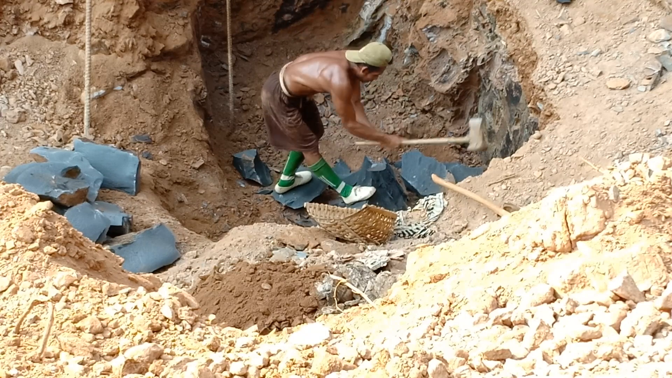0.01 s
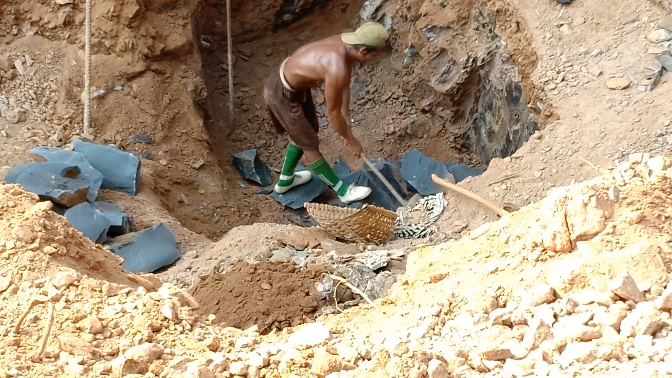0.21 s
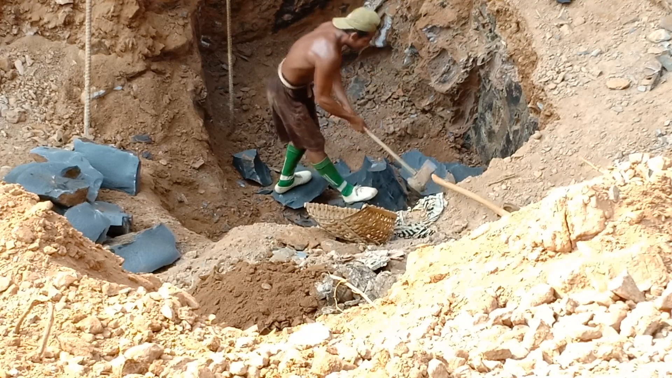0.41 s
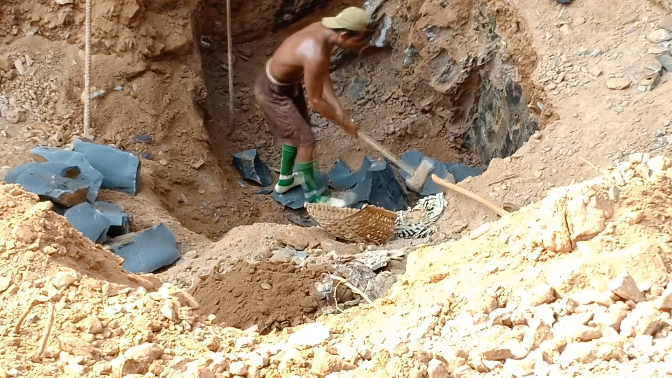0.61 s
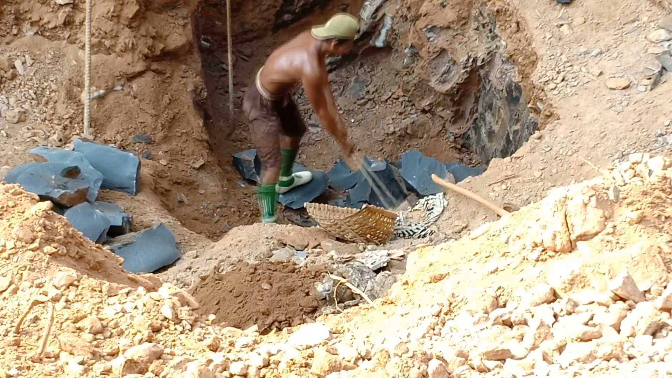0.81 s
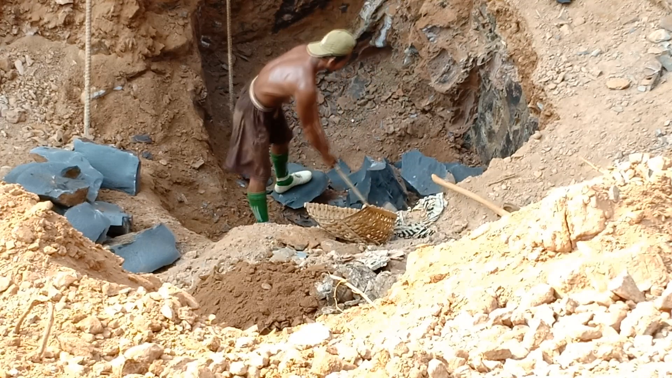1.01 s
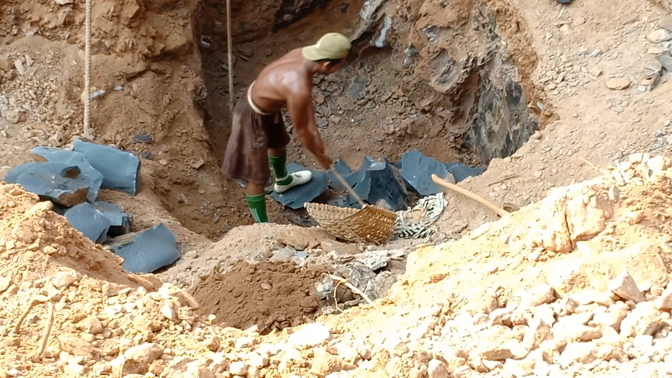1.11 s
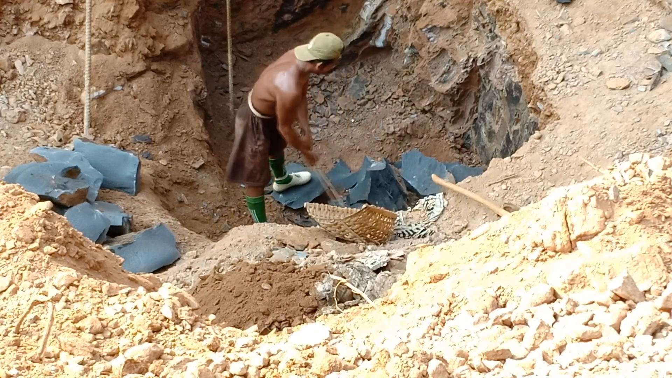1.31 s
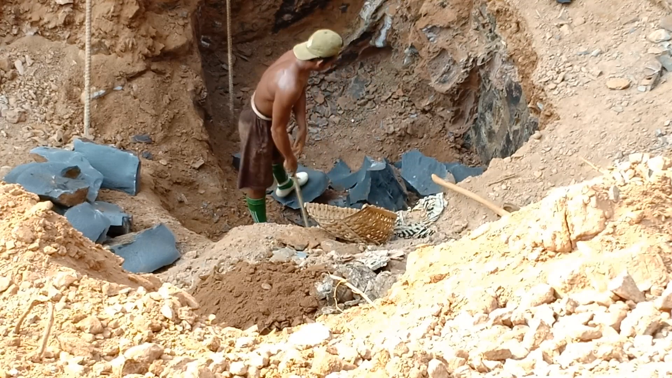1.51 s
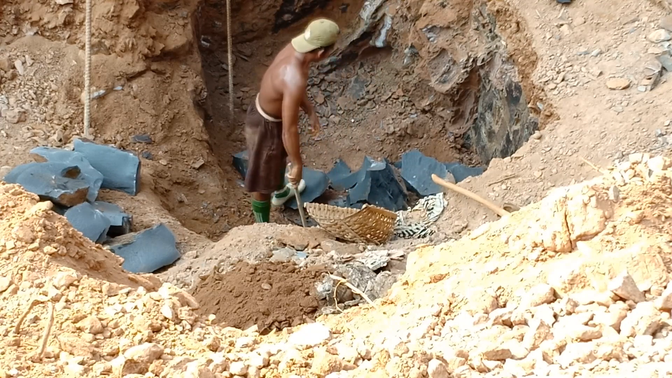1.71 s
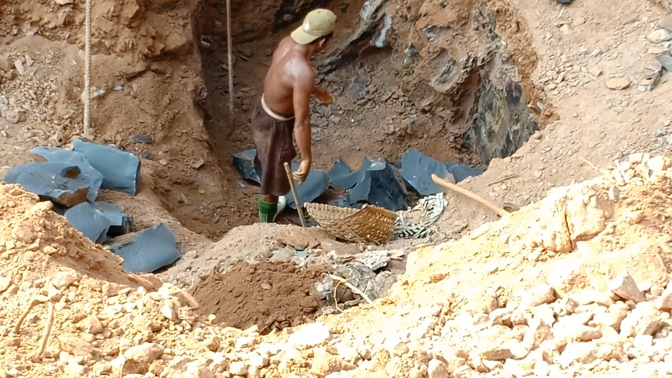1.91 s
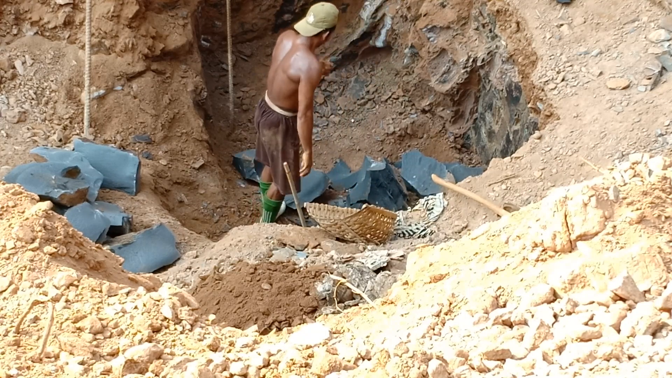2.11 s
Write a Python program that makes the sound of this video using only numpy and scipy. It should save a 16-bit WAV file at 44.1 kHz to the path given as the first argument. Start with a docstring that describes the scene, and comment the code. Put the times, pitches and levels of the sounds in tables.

```python
"""A steel hammer works hard rock in a quarry pit, over faint outdoor noise and a far, wavering hum.
After soft scuffs on the soil comes one heavy blow, and a loose flake tumbles; small chips tick.
Then follow a dull knock and a clink that chatters on stone, and later a loose stone shifts.
Contacts are clicks, bursts of noise and dying tones; the ground's thuds are low sine waves.
Fading noise makes the answer of the rubble and pit walls to hammer, chips and loose stone."""
import sys
import numpy as np
from scipy import signal
from scipy.fft import rfft, irfft
from scipy.io import wavfile
from scipy.ndimage import map_coordinates

SR = 44100
rng = np.random.default_rng(int(sys.argv[2]) if len(sys.argv) > 2 else 0)


def wrap_up_sound(samples):
    """Save the sound to the file named by the first command line argument, as 16-bit audio."""
    columns = np.atleast_2d(samples).T
    # keep every value between -1 and 1, then stretch to whole-number steps
    tamed = np.clip(columns, -1, 1)
    steps = np.round(tamed * 32767).astype(np.int16)
    wavfile.write(sys.argv[1], SR, steps)


N = 97020
T = np.arange(N) / SR
HZ = np.fft.rfftfreq(2 * N, 1 / SR)
REF_SAMPLES = SR // 100  # levels of contacts, chips and steel spread their energy over 10 ms

# The clink's contacts. Each row: start in seconds, level in dB, time for the crunch to fall 60 dB
# in seconds, treble boost or cut in dB.
CLINK_CONTACTS = [(.9483, -19.5, 0.018, 5.5), (.9515, -25, 0.054, -4.5), (.9596, -18, 0.0097, -8.5),
                  (.9632, -24.5, 0.044, -6.5), (.9821, -35.5, 0.018, 1)]
# The click's share of the energy of click and crunch together, 0 to 1, by kind of contact.
CLICK_SHARE = dict(blow=.17, knock=0.067, clink=0.17, small=0.51)
# Tone colour of the pit's answer. Each row: frequency in Hz, level in dB.
PIT_TONE = [(60, 2.5), (600, -6), (2000, -1.5), (12000, -0.5)]
# How alike the ears are for outdoor and soil noise. Each row: frequency in Hz, likeness (1 = same).
OUTDOOR_ALIKE = [(120, 0.73), (300, 0.41), (950, 0.068)]


def amp(db):
    """Turn decibels into gain."""
    return 10 ** (np.asarray(db) / 20)


def fade(t60):
    """A decay of 60 dB in t60 seconds."""
    return np.exp(-np.log(1000) * T / t60)


def norm(x):
    """Scale to energy 1 per channel, on average over the channels."""
    return x / np.sqrt(np.mean(np.sum(x ** 2, axis=-1)) + 1e-30)


def along(points, hz):
    """Read (Hz, value) points on a logarithmic frequency axis."""
    f, v = np.transpose(points)
    return np.interp(np.log(hz + 1), np.log(f + 1), v)


def filtered(x, response):
    """Pass x through a frequency response."""
    return irfft(rfft(x, 2 * N) * response)[..., :N]


def causal(colour):
    """A colour as a minimum-phase response, which puts its energy as early as it can."""
    c = irfft(along(colour, HZ) * np.log(10) / 20)
    return np.exp(rfft(np.r_[c[0], 2 * c[1:N]], 2 * N))


def delayed(x, s):
    """Make x start at s seconds."""
    k = int(np.clip(round(s * SR), 0, N - 1))
    return np.concatenate([np.zeros_like(x[..., :k]), x[..., :N - k]], axis=-1)


def noise(colour, alike):
    """Coloured stereo noise of rms 1; more side signal makes the ears less alike."""
    turn = np.arccos(np.clip(along(alike, HZ), -1, 1)) / 2
    shares = np.array([np.cos(turn), np.sin(turn)])
    mid, side = filtered(rng.standard_normal((2, N)), amp(along(colour, HZ)) * shares)
    return norm(np.array([mid + side, mid - side])) * np.sqrt(N)


def wobble(rate):
    """A smooth random curve with rate random points a second."""
    return map_coordinates(rng.standard_normal(256), [T * rate], mode="mirror")


def hammer():
    """The blow and its flake, the knock and the clink each ring a body and draw an answer from the pit."""
    # Contacts of the blow, the tumbling flake and the knock. Each row: start in seconds,
    # level in dB, time for the crunch to fall 60 dB in seconds, treble boost or cut in dB.
    blow_contacts = [(.2031, -15, .045, 0.5), (.2088, -17, .04, -1), (.2123, -18.5, .025, -11.5),
                     (.2149, -16, .04, -5)]
    flake_contacts = [(.2475, -31.5, 0.041, -9), (.2555, -26.5, 0.083, -4.5), (.266, -25.5, 0.15, -3),
                      (.2755, -28, 0.17, -5)]
    knock_contacts = [(.9216, -28.5, 0.072, 5.5)]
    # Tone colours of the contacts, and of the pit's answer from where the clink lands,
    # which the knock shares. Each row: frequency in Hz, level in dB.
    blow_tone = [(30, -35.5), (170, -3.5), (310, 0.5), (410, -1), (540, 5.5), (850, 2), (1400, -1.5),
                 (2700, -1.5), (3600, -19), (4200, -10.5), (6300, -8), (8200, -32.5), (15000, -36.5)]
    knock_tone = [(50, -11), (220, -4.5), (500, -3.5), (850, -3.5), (1300, -9.5), (2100, -2), (3000, -35),
                  (5500, -22.5), (8000, -54)]
    clink_tone = [(40, -10), (400, -10.5), (560, 9), (900, 6.5), (1300, -3), (2200, -0.5), (3700, -10),
                  (5200, -3.5), (6300, -2), (8200, -29.5), (15000, -28.5)]
    clink_pit_tone = [(100, 4), (750, -7), (1800, 1), (2800, 2), (5500, 0)]
    # Tones of the slab, its flake, the knocked block and the clinked rock. Each row: frequency
    # in Hz, typical level against the contact in dB, time to fall 60 dB in seconds.
    slab_modes = [(322, -19.5, 0.071), (596, -9, .05), (845, -10, 0.043), (1047, -18, 0.023),
                  (4290, -12, .015), (4410, -25, .3), (5200, -18, .035), (5690, -17, .02)]
    flake_modes = [(502.5, -4, 0.053)]
    block_modes = [(814, 7, 0.068), (990, -3.5, 0.028)]
    rock_modes = [(572, -11, 0.013), (842, -6, 0.019), (1064, -12, 0.055), (1982, -12, 0.1247)]

    blow = contacts(blow_contacts, blow_tone, slab_modes, CLICK_SHARE["blow"])
    flake = contacts(flake_contacts, blow_tone, flake_modes, CLICK_SHARE["blow"])
    knock = contacts(knock_contacts, knock_tone, block_modes, CLICK_SHARE["knock"])
    clink = contacts(CLINK_CONTACTS, clink_tone, rock_modes, CLICK_SHARE["clink"])
    return (in_pit(blow + flake, PIT_TONE, near_db=-16.5, tail_db=-11.5)
            + in_pit(knock, clink_pit_tone, near_db=-19, tail_db=-9.5, right_db=1.5)
            + in_pit(clink, clink_pit_tone, near_db=-5.5, tail_db=-11, lag_ms=.21, right_db=0.5)
            + in_pit(steel(), PIT_TONE, near_db=-20, tail_db=-17, lag_ms=.21))


def contacts(rows, colour, modes, click_share):
    """Each contact is a click and a short crunch of crushed grit, and rings the struck body if it has modes."""
    spread = 0.2  # how much the crunch differs between the ears
    treble_hz = 3375  # a hard contact is brighter above this, a soft one duller
    ring_blur = .003  # the grit roughens the ring: a mode's width over its frequency
    out = np.zeros((2, N))
    body = causal(colour)
    click_share = np.clip(click_share, 0, 1)
    click = norm(irfft(body)[:N])
    for s, db, t60, treble_db in rows:
        mid, side = rng.standard_normal((2, N)) * fade(t60)
        crunch = norm(filtered(np.array([mid + spread * side, mid - spread * side]), body))
        # each tone's level varies a little at random, by about 1 dB
        ring = sum(amp(level + rng.normal(0, 1)) * mode(hz, life, ring_blur)
                   for hz, level, life in modes)
        impact = ring - np.sqrt(click_share) * click + np.sqrt(1 - click_share) * crunch
        hardness = causal([(treble_hz / 2, 0), (treble_hz, treble_db)])
        out += amp(db) * delayed(filtered(impact, hardness), s)
    return out * np.sqrt(REF_SAMPLES)


def mode(hz, t60, blur):
    """One dying tone of energy 1; blur makes its phase wander, which roughens it."""
    wander = np.cumsum(rng.standard_normal(N)) * np.sqrt(2 * np.pi * abs(blur) * hz / SR)
    rise = 1 - np.exp(-T * hz)
    return norm(np.sin(2 * np.pi * hz * T + wander) * fade(t60) * rise)


def steel():
    """The clink rings the steel head, whose slight unevenness splits each partial into a beating pair."""
    # Tones of the head. Each row: frequency in Hz, level in dB, time to fall 60 dB in seconds.
    steel_modes = [(6098, -29.5, .48), (10160, -40.5, .34), (12180, -46, .3), (13560, -51, .24)]
    twin_split_hz, twin_db = 37, -5  # a weaker twin just above each partial
    ring = np.zeros(N)
    for hz, db, t60 in steel_modes:
        twin = amp(twin_db) * mode(hz + twin_split_hz, t60, blur=0)
        ring += amp(db) * norm(mode(hz, t60, blur=0) + twin)
    first_touch_s = CLINK_CONTACTS[0][0]
    return delayed(np.array([ring, ring]), first_touch_s) * np.sqrt(REF_SAMPLES)


def debris():
    """Small chips tick, each at its own pitch, and a loose stone shifts with short crunches."""
    # Falling chips. Each row: start in seconds, level in dB, pitch in Hz.
    chip_ticks = [(0.532, -59, 6250), (0.5326, -54.5, 4200), (0.5381, -56, 6170), (.543, -70, 6400),
                  (0.6571, -70.5, 6050), (0.737, -70, 5040), (1.752, -71, 5710), (1.9412, -74.5, 4510)]
    # The loose stone's contacts. Each row: start in seconds, level in dB, time for the crunch
    # to fall 60 dB in seconds, treble boost or cut in dB.
    stone_contacts = [(1.5385, -55, 0.064, 4), (1.5465, -49.5, 0.06, -5.5)]
    # Tone colour of the loose stone. Each row: frequency in Hz, level in dB.
    stone_tone = [(200, 0.5), (1000, -11), (1950, 10), (3500, -10.5), (12000, -36)]
    chip_t60_s, chip_blur = 0.028, 0.035  # a short, gritty ring; its width over its pitch
    chips = sum(amp(db) * delayed(mode(hz, chip_t60_s, chip_blur), s) for s, db, hz in chip_ticks)
    chips = chips * np.sqrt(REF_SAMPLES)
    stone = contacts(stone_contacts, stone_tone, [], CLICK_SHARE["small"])
    return in_pit(chips + stone, PIT_TONE, near_db=-16.5, tail_db=-10.0)


def in_pit(x, colour, near_db, tail_db, lag_ms=0, right_db=0):
    """Direct sound (left ear later by lag_ms, right louder by right_db), rubble scatter and the pit's tail."""
    # How long the tail lasts. Each row: frequency in Hz, time to fall 60 dB in seconds.
    tail_t60 = [(100, 0.9), (500, 0.59), (12000, 0.64)]
    # How alike the ears hear the pit. Each row: frequency in Hz, likeness (1 = same).
    pit_alike = [(120, 1), (300, 1), (600, 0.24), (1400, 0.056)]
    near_t60_s, near_rise_s = 0.21, 0.0072  # scatter from the rubble close by
    tail_rise_s = 0.02
    near = norm(noise(colour, pit_alike) * fade(near_t60_s) * (1 - np.exp(-T / near_rise_s)))
    # the tail is noise that fades at its own pace at each frequency
    hz, t, z = signal.stft(noise(colour, pit_alike), SR, nperseg=256)
    z = z * np.exp(-np.log(1000) * t / along(tail_t60, hz)[:, None])
    tail = signal.istft(z, SR, nperseg=256)[1][:, :N]
    tail = norm(tail * (1 - np.exp(-T / tail_rise_s)))
    room = amp(near_db) * near + amp(tail_db) * tail
    ears = np.array([[-.5], [.5]])  # left, right
    lag = np.exp(2j * np.pi * HZ * ears * lag_ms / 1000)
    direct = filtered(x, amp(ears * right_db) * lag)
    return direct + filtered(x.mean(axis=0), rfft(room, 2 * N))


def ground():
    """The soil takes impacts as low, dying thuds, and gives soft scuffs of swelling noise."""
    # Thuds. Each row: start in seconds, level in dB before the soft rise and decay, pitch in Hz,
    # time to fall 60 dB in seconds.
    thud_rows = [(0.205, -18, 106, 0.1), (0.22, -28.5, 245, 0.25), (0.256, -28.5, 73, 0.12),
                 (0.923, -33, 111.5, 0.12), (0.948, -27.5, 128.2, 0.16), (0.959, -28.5, 79, 0.15),
                 (1.547, -41.5, 129, 0.08)]
    # Scuffs. Each row: middle in seconds, level in dB, half length (Gaussian) in seconds.
    scuff_rows = [(0.055, -57, 0.042), (0.166, -52, 0.036), (1.539, -56, 0.019), (2.2, -54, 0.013)]
    # Tone colour of the scuffs. Each row: frequency in Hz, level in dB.
    scuff_tone = [(50, -3), (170, 2), (450, 3), (800, -10), (12000, -48)]
    rise = (1 - np.exp(-T / 0.0059)) ** 2  # soft start, time constant in seconds
    thuds = np.zeros(N)
    for s, db, hz, t60 in thud_rows:
        thuds += amp(db) * delayed(np.sin(2 * np.pi * hz * T) * fade(t60) * rise, s)
    strokes = sum(amp(db) * np.exp(-.5 * ((T - s) / half) ** 2) for s, db, half in scuff_rows)
    return thuds + strokes * noise(scuff_tone, OUTDOOR_ALIKE)


def outdoors():
    """Faint, steady open-air noise with a far hum that wavers in phase and level."""
    # Tone colour of the open air. Each row: frequency in Hz, level in dB.
    air_tone = [(25, -29), (55, -15), (90, -8), (200, -10), (700, -15.5), (1350, -24.5), (2400, -19),
                (3600, -33.5), (5800, -31), (8000, -41.5), (15000, -43)]
    # The hum's course before its random wavering. Each row: time in seconds, level in dB.
    hum_course = [(.5, -74), (.8, -64), (1.5, -65), (1.7, -72)]
    air = noise(air_tone, OUTDOOR_ALIKE) * amp(-59)
    hum = np.sin(2 * np.pi * 90.4 * T + wobble(13))  # 90.4 Hz, with a drifting phase
    hum_db = np.interp(T, *np.transpose(hum_course)) + 2.5 * wobble(9)
    return air + amp(hum_db) * hum


def scene():
    """Everything that sounds in the pit."""
    return hammer() + debris() + ground() + outdoors()


def record(dry):
    """Round off peaks near full scale and cut steeply above the band limit."""
    top_hz = 15800
    held = dry / (1 + np.abs(dry) ** 8) ** (1 / 8)
    return filtered(held, 1 / np.sqrt(1 + (HZ / top_hz) ** 100))


dry = scene()
out = record(dry)
wrap_up_sound(out)
```